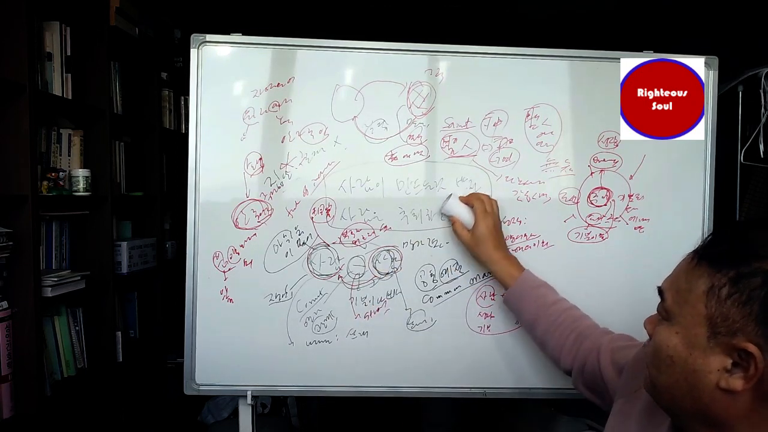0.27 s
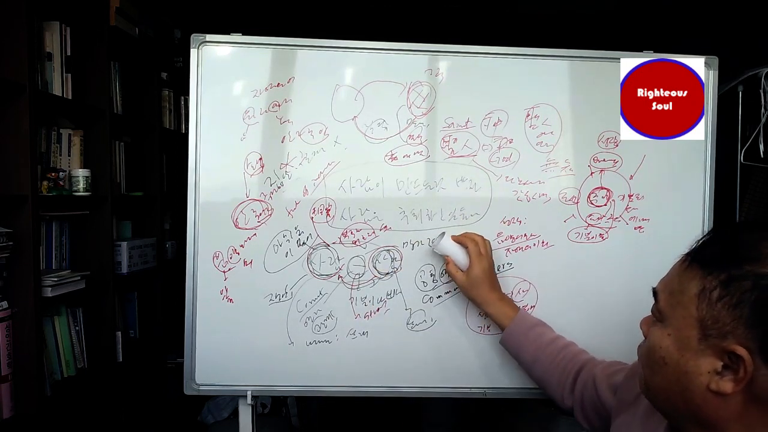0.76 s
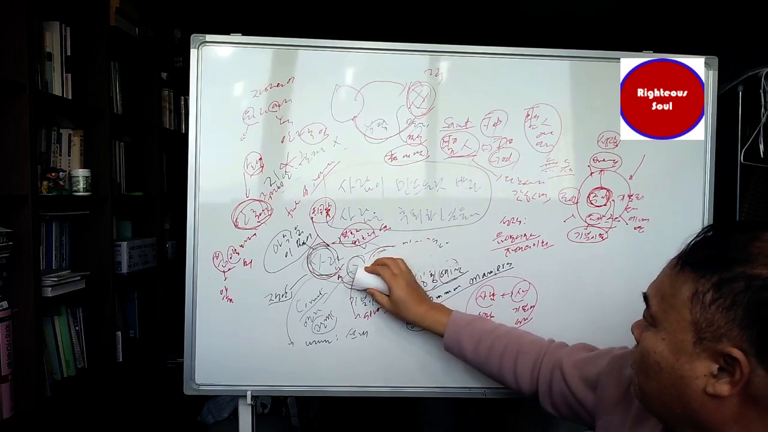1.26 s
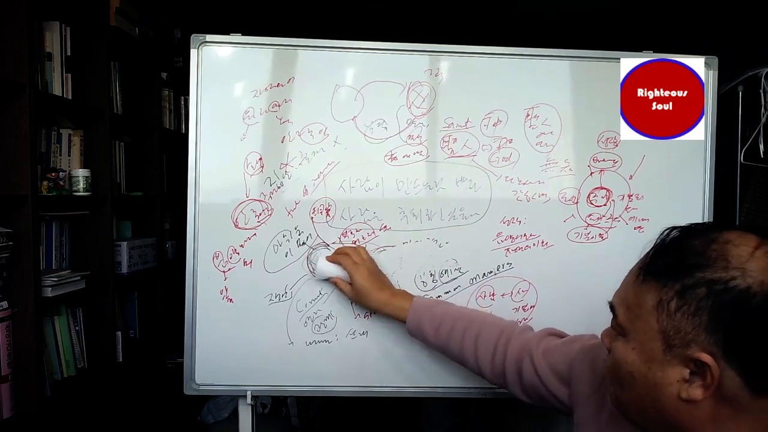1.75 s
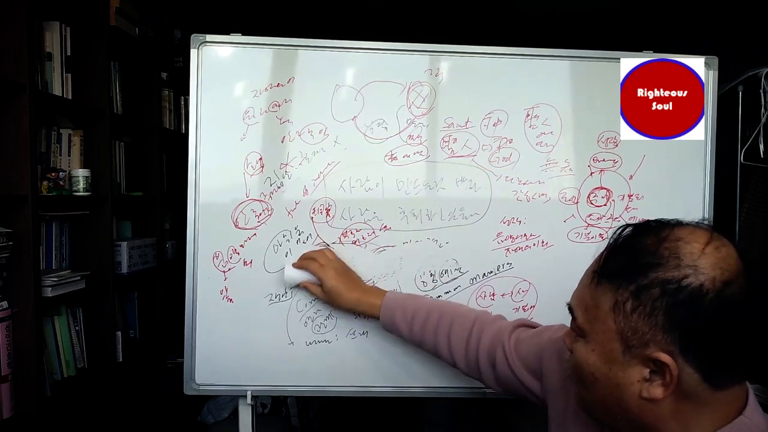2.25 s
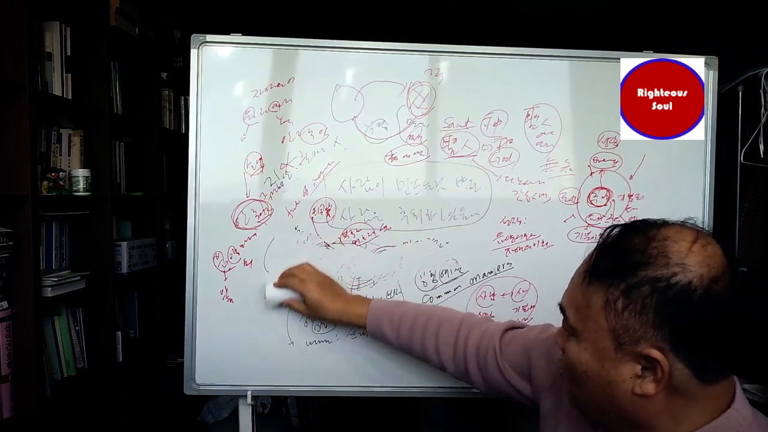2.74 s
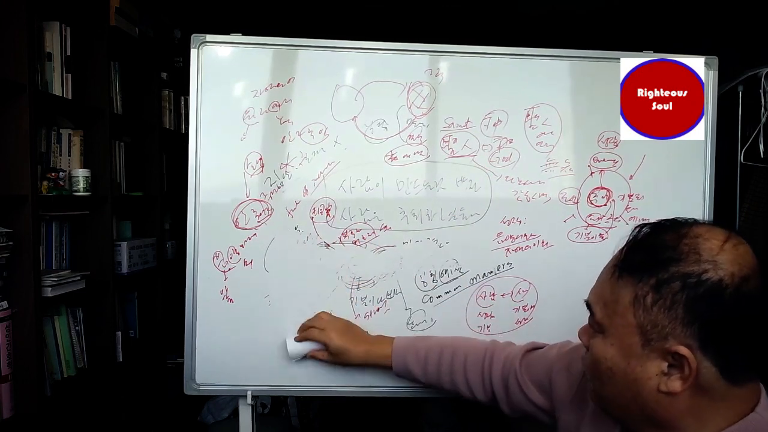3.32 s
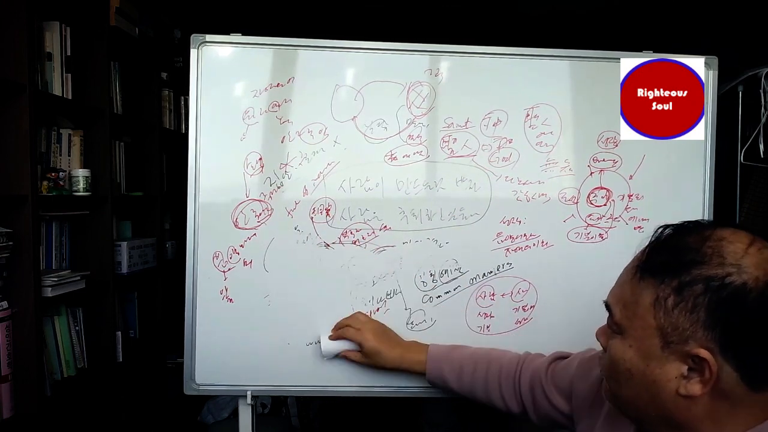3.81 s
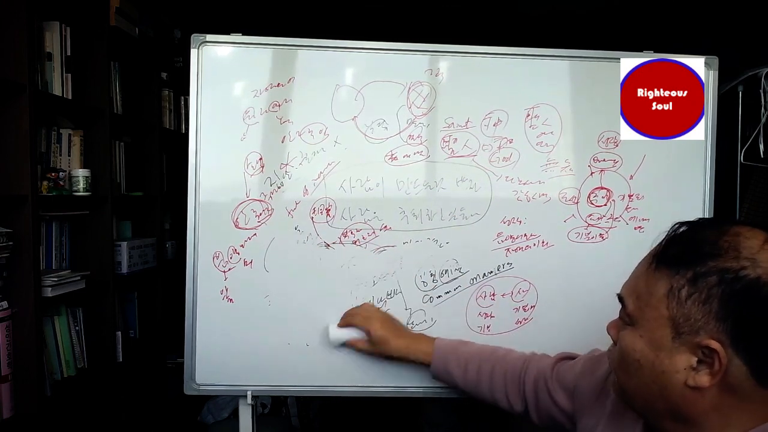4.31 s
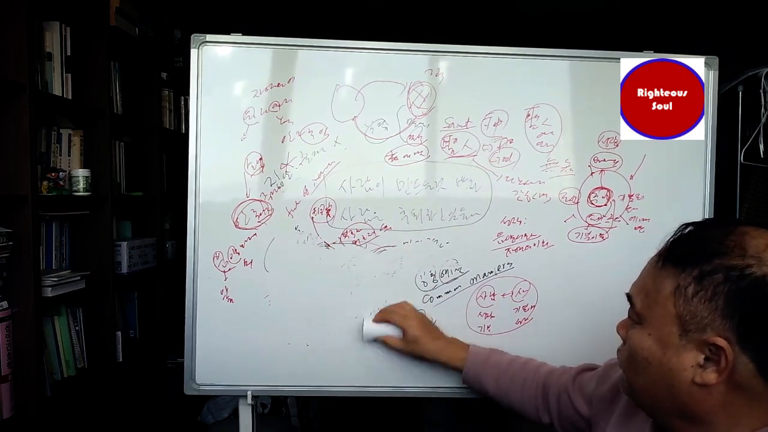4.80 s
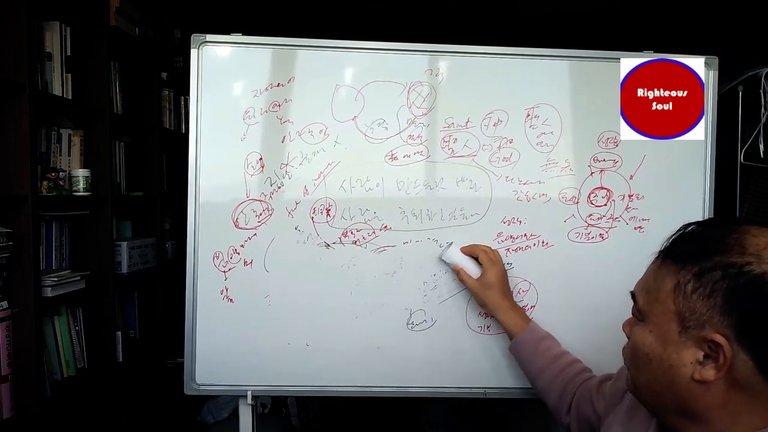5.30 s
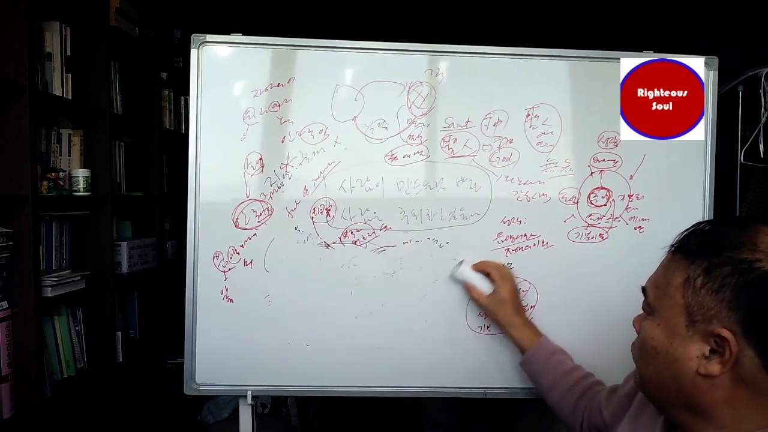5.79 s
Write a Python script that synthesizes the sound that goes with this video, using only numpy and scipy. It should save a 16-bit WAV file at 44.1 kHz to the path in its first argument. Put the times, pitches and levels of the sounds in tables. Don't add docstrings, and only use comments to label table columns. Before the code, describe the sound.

Light felt scuffs open over a steady hum and airy fan. After a low thump at about one second, brisk back-and-forth wiping begins, dry and hissy, with a bright edge click and scattered plastic knocks that make the thin panel ring briefly. Strokes and background both get louder toward the end. Small room with short reverberation, close single microphone, nearly centred.

```python
import sys
import numpy as np
from scipy import signal
from scipy.fft import rfft, irfft
from scipy.io import wavfile
from scipy.ndimage import uniform_filter1d

SR = 44100
rng = np.random.default_rng(int(sys.argv[2]) if len(sys.argv) > 2 else 0)


def magnitude_from_level(level_db):
    exponent = np.asarray(level_db, float) / 20
    return 10 ** exponent


def generate_wav(sig):
    pcm = np.round(np.clip(np.atleast_2d(sig).T, -1, 1) * 32767).astype(np.int16)
    wavfile.write(sys.argv[1], SR, pcm)


N = 267246
TIME_S = np.arange(N) / SR

# start_s, level_db
ROOM_GAIN = [(0.0, -41.5), (0.94, -41), (1.16, -37.5), (2.04, -37), (2.77, -34.5), (3.05, -36),
             (4.19, -34.5), (4.91, -34.5), (5.25, -33), (6.06, -32)]
# pitch_hz, level_db (per Hz)
AIR_COLOUR = [(20, -40), (33, 1), (60, -9), (300, -12.5), (700, -17), (1200, -18), (2000, -20.5),
              (3200, -32.5)]
# pitch_hz, width_hz, level_db (relative to the noise scale)
FAN_CASING = [(40.8, 20, -7.5), (188, 78, -20.5), (273.9, 19.2, -10.5), (369.4, 9.5, -20), (541, 6.4, -22),
              (610, 2.7, -25), (904.5, 30.6, -14.5), (1162, 54, -20)]
AIR_DB, HUM_HZ, HUM_DB = -4, 119.8, -2.5

# pitch_hz, decay_s
ROOM_DECAY = [(200, 0.26), (1000, 0.49), (3000, 0.2), (6000, 0.36), (12000, 0.2)]
PUSH_S = 0.9545
# start_s, pitch_hz, level_db, decay_s
HOLLOW_TAPS = [
    (1.127, 939, -25.5, 0.1),
    (1.13, 1500, -32, .08),
    (3.858, 714, -26.5, 0.18),
    (3.851, 1000, -28, .07),
    (4.131, 940, -30, 0.08),
    (5.503, 1450, -36, .12),
]

# pitch_hz, level_db (per Hz)
SNAP_COLOUR = [(4000, -6), (9000, -4), (14500, 0), (15400, 0), (16000, 10), (17000, 8)]
SNAP_S, SNAP_DB, SNAP_FADE_S = 1.6378, -17, 0.0015

# start_s, crack_db, panel_thud_db,
# body_db, body_pitch_hz
BACK_KNOCKS = [(0.4016, -36, -55, -42, 805), (0.637, -37, -70, -73, 778), (0.7665, -57, -64, -45.5, 930),
               (1.0385, -21, -33, -29.5, 1384), (1.1249, -30.5, -39, -35.5, 900),
               (1.4016, -39, -46, -45, 910), (1.5978, -18, -30, -31, 1380), (2.2487, -41, -35, -38, 1090),
               (2.6157, -10.5, -28, -29.5, 1310), (2.7515, -17.5, -32.5, -33, 806),
               (2.9224, -25, -41, -37, 1150), (2.9704, -16, -46, -32.5, 1640),
               (3.0604, -3.5, -24.5, -26.5, 1190), (3.3029, -9, -28.5, -28, 1210),
               (3.4519, -26.5, -42, -45, 620), (3.849, -26, -40, -30.5, 725), (4.129, -33, -55, -33, 945),
               (4.8821, -27, -41.5, -33, 784), (5.1039, -19.5, -55, -32, 790),
               (5.2076, -7, -23.5, -25.5, 1316), (5.4991, -40, -32, -31.5, 1470),
               (5.7536, -22, -51, -30.5, 904),
               (3.049, -18, -50, -40, 1880),
    (5.199, -23, -45, -35, 705),
]
# start_s, crack_db, panel_thud_db, body_db, body_pitch_hz
EDGE_CLICKS = [
    (1.6368, -12, -37, -72, 1390),
]
BACK_SHEEN_DB, EDGE_SHEEN_DB = -57, -17.5
# pitch_hz, level_db (per Hz)
CRACK_COLOUR = [(1200, -8), (2200, -5.5), (3300, 2.5), (4500, 5.5), (6000, 1.5), (7200, -4), (9000, -20),
                (12000, -19)]
# pitch_hz, level_db (per Hz)
BODY_COLOUR = [(300, -6.5), (700, 0), (1300, -0.5), (2200, -1), (3500, 1), (5000, -25)]
# pitch_hz, level_db, decay_s
BOARD_MODES = [(625, -12, .2), (805, -16, .15), (1150, 15, 0.13), (1320, -42, .2), (2320, 12, 0.4),
               (2270, -29, 0.24), (4660, -21, 0.056), (5660, -41, 0.1), (5630, 17, 0.052), (5800, 2, 0.047),
               (6300, 15, 0.099)]
# pitch_hz, level_db, decay_s
PANEL_MODES = [(204.4, -10, 0.39), (219.4, 2, 0.22), (276, -16, 0.11)]

# start_s, length_s, hiss_db, top_speed_share (of the length), pressure_db
WIPES = [(1.014, 0.39, -45, 0.68, 3), (1.385, 0.21, -45, 0.14, 1), (1.675, 0.31, -42, 1, 2),
         (1.978, 0.089, -44, 0.2, 3), (2.03, 0.29, -44, 0.12, 3), (2.228, 0.28, -46, 0.34, 5.5),
         (2.393, 0.23, -41.5, 0.92, 3), (2.652, 0.29, -40, .65, 4), (2.992, 0.21, -44, 0.56, 8.5),
         (3.206, 0.26, -41, 0.32, 5.5), (3.416, 0.3, -40, 0.71, 2.5), (3.706, 0.25, -38, 0.62, 2.5),
         (3.962, 0.1, -44.5, 0.42, 3), (4.034, 0.24, -44.5, 0.22, 4), (4.201, 0.11, -41, 0.68, 4),
         (4.306, 0.31, -37, 0.64, 2), (4.61, 0.21, -37.5, 0.58, 3.5), (4.827, 0.22, -39.5, 0.66, 2.5),
         (5.073, 0.14, -48, .4, 6), (5.218, .21, -33.5, 0.44, 2.5), (5.435, 0.3, -35, .35, 1.5),
         (5.71, 0.4, -34.5, 0.35, -1)]
# start_s, length_s, hiss_db, top_speed_share (of the length)
EDGE_SCUFFS = [(-.02, 0.12, -39, 0.17), (0.101, 0.074, -39.5, 0.55), (.17, 0.084, -42.5, 0.29),
               (0.236, 0.11, -54.5, 0.34), (0.325, 0.075, -44, 0.75), (0.426, .05, -41, 0.32),
               (0.587, 0.027, -46.5, .4), (0.629, .12, -39.5, 0.15), (0.951, 0.095, -42.5, 0.35),
               (5.302, 0.061, -27, 0.85), (5.875, .06, -32.5, .45)]
# pitch_hz, level_db (per Hz)
HISS_COLOUR = [(2500, -18), (3500, -9), (4800, -4), (6000, 0), (7000, -4), (8000, -10), (9000, -20)]
# pitch_hz, level_db (per Hz)
SHEEN_COLOUR = [(6500, -12), (8000, 0), (10000, -4), (12000, -7), (14000, -7), (16000, -6)]
# pitch_hz, level_db (per Hz)
DRONE_COLOUR = [(300, -50), (700, 7), (1500, 1.5), (2500, 3.5), (3500, 4), (4500, -3.5), (6000, -9)]
LOUDENING, SCUFF_PRESS_DB = 0.83, 1.5
SHEEN_DB, DRONE_DB, DRONE_PER_PRESS = -12, -11, 2.65
REST_DB, REST_SHEEN_DB, REST_DRONE_DB = -14.5, -20, -15.5

# pitch_hz, likeness (0-1)
SIDE_LIKENESS = [(100, 0.94), (400, 1), (1000, 1), (2500, 0.94), (5000, 0.82), (8000, 1), (11000, 1),
                 (15000, 1)]
RIGHT_LATE_SAMPLES, CEILING = 6.72, 0.95
BAND_LIMIT_HZ, LEAK_DB = 15380, -42


def evened(x):
    return x / np.sqrt(np.mean(x ** 2) + 1e-20)


def noise():
    return rng.standard_normal(N)


def since(start_s):
    return np.maximum(TIME_S - start_s, 0)


def read(points, hz):
    f, value = np.transpose(points)
    return np.interp(np.log(hz + 1), np.log(f + 1), value)


def colour(x, points):
    hz = np.fft.rfftfreq(len(x), 1 / SR)
    below = np.maximum(np.log2(points[0][0] / (hz + 1)), 0)
    above = np.maximum(np.log2((hz + 1) / points[-1][0]), 0)
    return irfft(rfft(x) * magnitude_from_level(read(points, hz) - 60 * (below + above)), len(x))


def wander(per_s):
    steps = rng.standard_normal(int(N / SR * per_s) + 3)
    held = np.repeat(steps, int(SR / per_s) + 1)[:N]
    return evened(uniform_filter1d(held, int(SR / per_s)))


def resonate(x, hz, width_hz):
    turn = np.exp(2j * np.pi * hz * np.arange(len(x)) / SR)
    r = np.exp(-np.pi * width_hz / SR)
    return 2 * (turn * signal.lfilter([1 - r], [1, -r], x / turn)).real


def ring(modes, t, detune):
    hz, db, decay_s = np.transpose(modes)[:, :, None]
    sines = np.sin(2 * np.pi * hz * detune[:, None] * t)
    return evened((magnitude_from_level(db - 60 * t / decay_s) * sines).sum(0))


def room_level_db():
    start_s, level_db = np.transpose(ROOM_GAIN)
    return np.interp(TIME_S, start_s, level_db)


def fan():
    air = magnitude_from_level(AIR_DB + wander(9)) * evened(colour(noise(), AIR_COLOUR))
    tones = np.zeros(N)
    for hz, width_hz, db in FAN_CASING:
        tone = resonate(resonate(noise(), hz, width_hz), hz, width_hz)
        tones += magnitude_from_level(db) * evened(tone)
    turns = np.cumsum(HUM_HZ + 0.35 * wander(2.82)) / SR
    hum = magnitude_from_level(HUM_DB + 0.19 * wander(14)) * np.sqrt(2) * np.sin(2 * np.pi * turns)
    return magnitude_from_level(room_level_db()) * (air + tones + hum)


def bump():
    t = since(PUSH_S)
    swing = magnitude_from_level(-22.5 - 60 * t / 0.099) * np.sin(2 * np.pi * 150 * t)
    rap = magnitude_from_level(-33 - 60 * t / 0.08) * np.sin(2 * np.pi * 400 * t)
    sway = magnitude_from_level(-37 - 60 * t / 1.1) * np.sin(-2 * np.pi * 40 * t)
    return swing + rap + sway


def rumble():
    t = since(PUSH_S)
    shiver = evened(colour(noise(), [(30, 2), (150, 9), (450, 1)]))
    return (t > 0) * magnitude_from_level(-32 - 60 * t / 0.35) * shiver


def taps():
    out = np.zeros(N)
    for start_s, hz, db, decay_s in HOLLOW_TAPS:
        t = since(start_s)
        swell = 1 - np.exp(-t / 0.0068)
        out += magnitude_from_level(db - 60 * t / decay_s) * swell * np.sin(2 * np.pi * hz * t)
    return out


def snap():
    t = since(SNAP_S)
    fade = (t > 0) * np.exp(-t / SNAP_FADE_S)
    return magnitude_from_level(SNAP_DB) * fade * evened(colour(noise(), SNAP_COLOUR))


def tail(t):
    hz, frame_s, z = signal.stft(rng.standard_normal(len(t)), SR, nperseg=256)
    z = z * magnitude_from_level(-60 * frame_s / read(ROOM_DECAY, hz)[:, None])
    dying = signal.istft(z, SR, nperseg=256)[1][:len(t)]
    return dying * (1 - np.exp(-t / 0.002))


def knock(crack_db, thud_db, body_db, body_hz, sheen_db):
    t = np.arange(SR // 3) / SR
    chatter = rng.standard_normal(len(t)) * (t / 0.002) * np.exp(-t / 0.003)
    rattle = evened(uniform_filter1d(rng.standard_normal(len(t)), 250))
    blow = magnitude_from_level(-0.5) * chatter + tail(t) * magnitude_from_level(0.5 * rattle)
    modes = ring(BOARD_MODES, t, rng.uniform(0.93, 1.02, len(BOARD_MODES)))
    struck = evened(signal.fftconvolve(modes, chatter[:400])[:len(t)])
    crack = evened(colour(blow, CRACK_COLOUR)) + magnitude_from_level(-8) * evened(colour(struck, CRACK_COLOUR))
    hollow = evened(resonate(resonate(blow, body_hz, 120), body_hz, 120))
    body = evened(colour(blow, BODY_COLOUR)) + magnitude_from_level(-9) * hollow
    sheen = evened(colour(blow, SHEEN_COLOUR))
    thud = ring(PANEL_MODES, t, rng.uniform(0.94, 1.04, len(PANEL_MODES)))
    thud = thud * (1 - np.exp(-t / 0.0042))
    bright = magnitude_from_level(crack_db - 21) * crack + magnitude_from_level(body_db - 8.5) * body + magnitude_from_level(sheen_db - 10) * sheen
    damping = 1 / (1 + (t / 0.073) ** 4)
    return damping * bright + magnitude_from_level(thud_db - 12) * thud


def swept(start_s, length_s, hiss_db, top, press_db):
    u = np.clip((TIME_S - start_s) / length_s, 0, 1)
    top = np.clip(top, 0.1, 0.9)
    speed = np.sin(np.pi / 2 * np.minimum(u / top, (1 - u) / (1 - top)))
    shares_db = [[0], [SHEEN_DB + press_db], [DRONE_DB + DRONE_PER_PRESS * press_db]]
    return (magnitude_from_level(hiss_db) * speed ** LOUDENING * magnitude_from_level(shares_db)) ** 2


def felt():
    rest_db = np.array([[REST_DB], [REST_SHEEN_DB], [REST_DRONE_DB]])
    power = magnitude_from_level(room_level_db() + rest_db) ** 2
    for row in WIPES:
        power += swept(*row)
    for row in EDGE_SCUFFS:
        power += swept(*row, SCUFF_PRESS_DB)
    clumps_db = 0.73 * wander(60) + wander(30)
    slips = noise() * magnitude_from_level(2 * rng.exponential(1, N) + clumps_db)
    layers = [evened(colour(slips, shape)) for shape in (HISS_COLOUR, SHEEN_COLOUR, DRONE_COLOUR)]
    return (np.sqrt(power) * layers).sum(0)


def scene():
    mono = fan() + bump() + rumble() + taps() + snap() + felt()
    back, edge = (BACK_KNOCKS, BACK_SHEEN_DB), (EDGE_CLICKS, EDGE_SHEEN_DB)
    for rows, sheen_db in (back, edge):
        for start_s, crack_db, *row in rows:
            part = mono[round((start_s - 0.001) * SR):][:SR // 3]
            part += knock(crack_db, *row, crack_db + sheen_db)[:len(part)]
    return np.array([mono, mono])


def random_turns(shape):
    return np.exp(2j * np.pi * rng.random(shape[::-1])).T


def spill(mid, side):
    flicker_db = 3.6 * evened(uniform_filter1d(rng.standard_normal(mid.shape[1]), 9))
    return mid + magnitude_from_level(-19 + flicker_db) * side * random_turns(mid.shape)


def blur_side(pair):
    sum_and_difference = [pair[0] + pair[1], pair[0] - pair[1]]
    hz, _, (mid, side) = signal.stft(sum_and_difference, SR, nperseg=512)
    same = np.clip(read(SIDE_LIKENESS, hz), 0, 1)[:, None]
    mid = spill(mid, side)
    side = side * (same + np.sqrt(1 - same ** 2) * random_turns(mid.shape))
    leak = magnitude_from_level(-31.5 - hz[:, None] / 200) + magnitude_from_level(-21.5)
    side = side + leak * mid * random_turns(mid.shape)
    return signal.istft([mid + side, mid - side], SR, nperseg=512)[1][:, :N] / 2


def top_cut(x):
    return signal.sosfilt(signal.butter(12, 16460, fs=SR, output="sos"), x)


def record(dry):
    held = dry / (1 + (dry / CEILING) ** 8) ** 0.125
    delay = np.exp(-2j * np.pi * np.fft.rfftfreq(N) * RIGHT_LATE_SAMPLES)
    pair = np.array([held[0], irfft(rfft(held[1]) * delay, N)])
    low = signal.oaconvolve(pair, signal.firwin(511, BAND_LIMIT_HZ, fs=SR)[None], "same")
    limited = low + magnitude_from_level(LEAK_DB) * (pair - low)
    mix = blur_side(limited) + 0.00072
    return top_cut(mix)


dry = scene()
out = record(dry)
generate_wav(out)
```